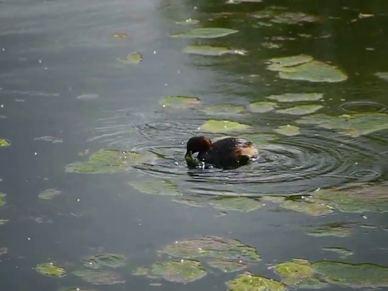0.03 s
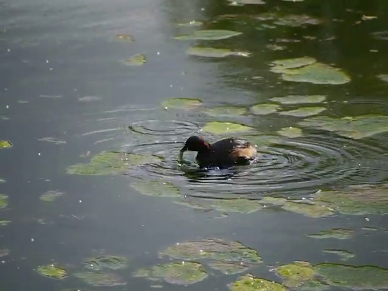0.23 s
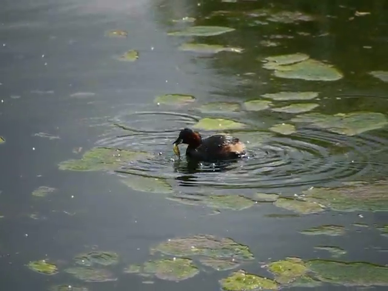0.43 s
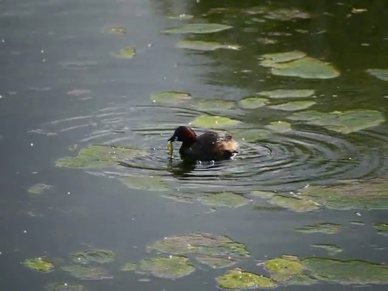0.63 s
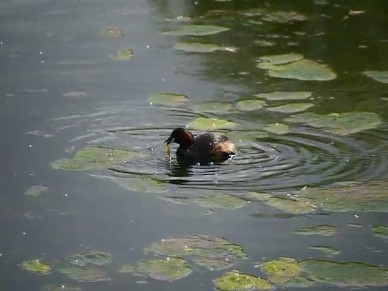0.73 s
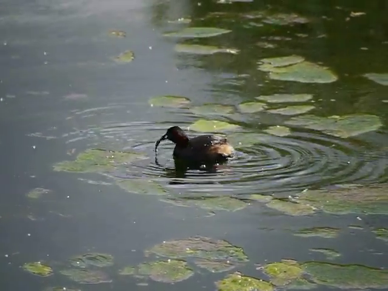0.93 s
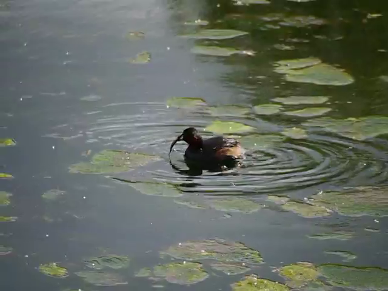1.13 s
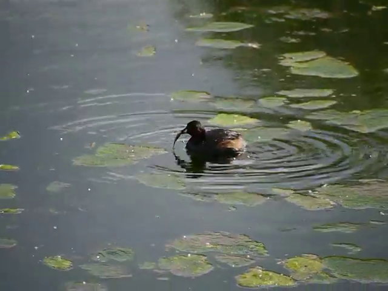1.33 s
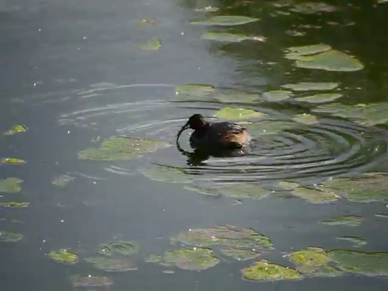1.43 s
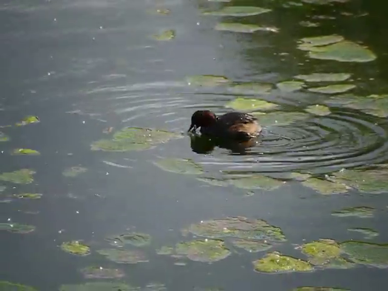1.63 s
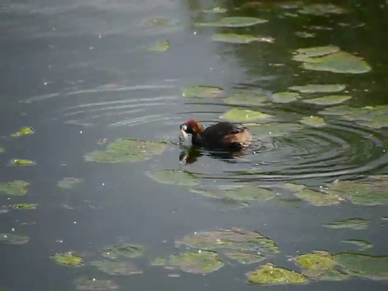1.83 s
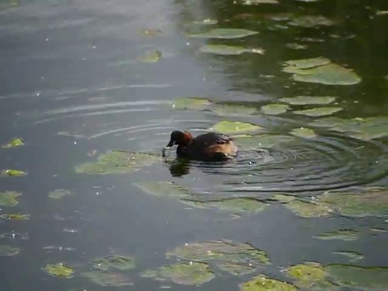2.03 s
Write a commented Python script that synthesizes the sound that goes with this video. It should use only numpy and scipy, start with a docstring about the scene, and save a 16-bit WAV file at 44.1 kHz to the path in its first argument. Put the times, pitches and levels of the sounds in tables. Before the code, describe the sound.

Songbirds whistle and chirp briefly over a steady distant rush and a light breeze.

```python
"""Songbirds whistle around a pond: thin far chirps, a mellow phrase from the right ending on a held
note, one sharp pip close on the left, a high falling slur and a rising call. Each note is a pure tone
that bends in pitch, and the trees and the far bank throw it back. Under them lie a steady rush of
distant traffic and leaves and one faint low tone. A breeze buffets the microphone, then dies away."""
import sys
import numpy as np
from scipy import signal
from scipy.fft import rfft, irfft
from scipy.io import wavfile
from scipy.ndimage import uniform_filter1d

SR = 44100
rng = np.random.default_rng(int(sys.argv[2]) if len(sys.argv) > 2 else 0)


def master(y):
    """Save y as 16-bit WAV."""
    cut = np.clip(np.atleast_2d(y).T, -1, 1)
    pcm = np.round(cut * 32767)  # scale
    wavfile.write(sys.argv[1], SR, pcm.astype(np.int16))


N = 92610
SIDE_LAG_S = .00009  # how much later a far sound reaches the right side


def undb(db):
    """Turn decibels into a gain to multiply by."""
    return 10 ** (np.asarray(db) / 20)


def unit(x):
    """Scale a signal to an average power of 1."""
    return x / np.sqrt(np.mean(np.abs(x) ** 2))


def over_hz(points):
    """Read a table of (pitch_hz, value) at every frequency of the spectrum."""
    pitch_hz, values = np.array(points, float).T
    return np.interp(np.log(np.fft.rfftfreq(N, 1 / SR) + 1), np.log(pitch_hz), values)


def wander(rate_hz):
    """A smooth random wobble with a typical size of 1."""
    hold = max(int(SR / rate_hz), 2)
    steps = rng.standard_normal(N)[np.arange(N) // hold]
    return unit(uniform_filter1d(uniform_filter1d(steps, hold), hold))


def delay(x, seconds):
    """The same sound, later."""
    hz = np.fft.rfftfreq(2 * N, 1 / SR)
    return irfft(rfft(x, 2 * N) * np.exp(-2j * np.pi * hz * seconds))[:N]


def place(x, pan_db, lag_s):
    """Give a sound a direction: the left is louder by pan_db, the right later by lag_s."""
    return np.array([x * undb(pan_db / 2), delay(x, lag_s) * undb(-pan_db / 2)])


def distant_rush(gain_db=-37.87):
    """Traffic and leaves blur into noise with faint drones, alike on both sides except in the treble."""
    # tone colour of the rush: pitch_hz, relative_db
    spectrum = [(35, -64.5), (60, -38.5), (147, -19.5), (230, -16), (295, -9), (420, -8), (540, -8),
                (700, -6), (960, -4), (1230, 0), (1450, -4.5), (1750, -8), (2600, -10.5), (3250, -15.5),
                (5900, -21), (7200, -28), (7800, -37)]
    # narrow bands that hum: pitch_hz, half_width_hz, level_db
    drones = [(395, 26, -55), (815, 23, -52)]
    # how alike the two sides are: pitch_hz, likeness (0 to 1)
    likeness = [(100, 0.9), (300, 1), (1300, 0.96), (2400, 1), (3200, 0.5), (5500, 0.25), (8000, 0.3)]
    # which side is louder: pitch_hz, left_minus_right_db
    side_levels = [(300, 1.5), (700, 1), (1200, -2.5), (1900, -2.5), (3000, -5), (7000, -3.5)]
    # how far the left wave runs ahead: pitch_hz, lead_radians
    left_lead = [(150, 0.16), (500, 0.59), (1100, 1.17), (2700, 1.59), (4500, 2.5), (6000, 0.35)]
    # the level dips briefly early on: time_s, change_db
    level_changes = [(0, -1), (.25, -1), (.275, -3.5), (0.359, -1.04), (0.801, 0.1), (1.5, 0), (2.1, -0.04)]
    hz = np.fft.rfftfreq(N, 1 / SR)
    bass_cut = np.minimum(hz / spectrum[0][0], 1) ** 2
    power = (unit(undb(over_hz(spectrum)) * bass_cut) * undb(gain_db)) ** 2
    for centre, width, db in drones:
        peak = 1 / (1 + ((hz - centre) / width) ** 2)
        power += (undb(db) * unit(peak)) ** 2
    alike = np.clip(over_hz(likeness), 0, 1)
    balance = undb(over_hz(side_levels) / 2)
    left, unrelated = rfft(rng.standard_normal((2, N)))
    right = alike * left * np.exp(-1j * over_hz(left_lead)) + np.sqrt(1 - alike ** 2) * unrelated
    swell = undb(np.interp(np.arange(N) / SR, *np.array(level_changes).T))
    return swell * irfft(np.sqrt(power) * np.array([left * balance, right / balance]), N)


def breeze(flutter_db=1.5):
    """Swirls of air hit each side of the microphone on its own, in ragged gusts and a few thumps."""
    # strength of the gusts: time_s, left_db, right_db
    gusts = np.array([(0, -41.5, -35), (.05, -39.5, -38), (0.089, -38.5, -32.5), (.23, -38, -32),
                      (.29, -39, -35.5), (.36, -43, -41), (.405, -32, -36), (.485, -57.5, -46),
                      (.55, -44, -39.5), (.60, -40, -35.5), (0.775, -39, -36.5), (0.851, -52, -41.5),
                      (.94, -39.5, -39.5), (1.088, -57, -53), (1.113, -36.5, -37), (1.19, -40, -39),
                      (1.25, -48, -45), (1.32, -61, -60.5), (1.46, -48.5, -46.5), (1.6, -72.5, -71)])
    # single swirls that thump: peak_time_s, half_length_s, left_db, right_db
    thumps = [(0.246, 0.011, -35, -30.5), (0.456, 0.006, -39, -35.5), (0.671, .009, -34, -32),
              (0.733, 0.0095, -42.5, -39.5), (1.114, .009, -32, -34)]
    # tone colour of the wind's rumble: pitch_hz, relative_db
    spectrum = [(30, -46), (55, -28), (85, -12.5), (130, -2.5), (200, 1.5), (330, -0.5), (500, -7),
                (900, -20.5), (2500, -65.5)]
    t, sides = np.arange(N) / SR, []
    colour = unit(undb(over_hz(spectrum)))
    for side in range(2):
        gust_db = np.interp(t, gusts[:, 0], gusts[:, 1 + side])
        force = undb(gust_db + flutter_db * wander(54.7))
        for at, width, *db in thumps:
            force += undb(db[side]) * np.exp(-((t - at) / width) ** 2)
        sides.append(irfft(rfft(force * rng.standard_normal(N)) * colour, N))
    return np.array(sides)


def whistle(notes, waver, flutter_db, fade_power=0.66, pointed=0.):
    """Pure notes swell and fade as the pitch bends through three points, in a round or pointed arch."""
    t, out = np.arange(N) / SR, np.zeros(N)
    drift = 1 + waver * wander(260)
    flutter = undb(flutter_db * wander(150))
    for start, length, first, middle, last, db in notes:
        on = (t > start) & (t < start + length)
        progress = (t[on] - start) / length
        bend = [0, .5, 1], [first, middle, last]
        round_hz = np.polyval(np.polyfit(*bend, 2), progress)
        hz = ((1 - pointed) * round_hz + pointed * np.interp(progress, *bend)) * drift[on]
        swell = np.sin(np.pi * progress) ** fade_power
        out[on] += undb(db) * swell * np.sin(2 * np.pi * np.cumsum(hz) / SR)
    return np.sqrt(2) * out * flutter


def branches(x, count=40, fade_s=.11):
    """Quick echoes off nearby branches smear each note."""
    distance, direction, flip = rng.random((count, 3)).T
    delay_s = 0.002036 + distance * fade_s / 3
    size = undb(-60 * delay_s / fade_s)
    gains = size * np.sign(flip - .5) / np.sqrt(np.sum(size ** 2))
    echoes = np.zeros((2, SR))
    for side in range(2):
        arrival_s = delay_s + side * 2 * SIDE_LAG_S * direction
        np.add.at(echoes[side], (arrival_s * SR).astype(int), gains)
    return np.array([signal.fftconvolve(x, echo)[:N] for echo in echoes])


def trees(x, fade_s, build_s=0.027):
    """Trees and banks scatter sound into a soft tail, unlike on each side, that drops 60 dB in fade_s."""
    t = np.arange(SR) / SR
    tail = (1 - np.exp(-t / build_s)) * np.exp(-np.log(1000) * t / fade_s)
    echoes = rng.standard_normal((2, SR)) * tail / np.sqrt(np.sum(tail ** 2))
    return np.array([signal.fftconvolve(x, echo)[:N] for echo in echoes])


def far_bird(song, pan_db, smear_db, tail_db, fade_s):
    """A far song arrives three ways: straight, smeared by branches and scattered by trees."""
    smear = undb(smear_db + np.array([[pan_db], [-pan_db]]) / 2) * branches(song)
    return place(song, pan_db, SIDE_LAG_S) + smear + undb(tail_db) * trees(song, fade_s)


def thin_chirps():
    """A far bird on the left gives thin chirps that rise and fall."""
    # arched chirps: start_s, length_s, start_hz, top_hz, end_hz, level_db
    notes = [(.200, 0.051, 4100, 4660, 3730, -50.5), (.512, 0.058, 4120, 4680, 3970, -55),
             (.614, 0.051, 3850, 4500, 3810, -49.5), (.888, 0.054, 4480, 4870, 4460, -50.5),
             (1.245, 0.074, 4350, 4730, 4380, -58), (1.582, 0.058, 4450, 4920, 4250, -51)]
    song = whistle(notes, waver=0.0046, flutter_db=3.8, pointed=.7)
    return far_bird(song, pan_db=8, smear_db=-10, tail_db=-11, fade_s=.4)


def mellow_phrase():
    """A bird on the right whistles a run of mellow, wavering notes."""
    # notes of the phrase: start_s, length_s, start_hz, middle_hz, end_hz, level_db
    notes = [(.348, .040, 2073, 2310, 2390, -41.5), (.370, 0.05, 2374, 2450, 2434, -33),
             (.420, 0.037, 2380, 2283, 2110, -37), (.560, .075, 1958, 1946, 1780, -41.5),
             (.612, 0.098, 1896, 1857, 1794, -36.5), (.772, 0.048, 2480, 2354, 2000, -35.5),
             (.855, 0.0947, 2080, 2014, 2004, -43), (.908, 0.06, 2001, 2007, 1870, -40),
             (1.238, 0.036, 1973, 1954, 2040, -36.5), (1.278, 0.052, 1967, 2005, 2050, -40),
             (1.312, 0.022, 2340, 2278, 2110, -32)]
    song = whistle(notes, waver=0.012, flutter_db=1.5)
    return far_bird(song, pan_db=-3, smear_db=-6, tail_db=-7, fade_s=1)


def close_pip(octave_db=-45):
    """A close bird gives one loud pip with a faint octave; branches, banks and trees throw it back."""
    # the pip: start_s, length_s, start_hz, middle_hz, end_hz, level_db
    notes = [(0.6673, 0.026, 3780, 3809, 3848, -18.5)]
    # echoes off the banks: delay_s, level_db, left_minus_right_db
    bank_echoes = [(.010, -15, -10.5), (.0765, -17, -7.5), (.105, -22.5, 5), (.121, -28, 1),
                   (.141, -28.5, -7), (.190, -27, 2.5), (.228, -33, 6)]
    pip = whistle(notes, waver=0.001, flutter_db=1.5, fade_power=0.71)
    octave = [(start, length, 2 * first, 2 * middle, 2 * last, db + octave_db)
              for start, length, first, middle, last, db in notes]
    direct = place(pip + whistle(octave, waver=0.0047, flutter_db=5), pan_db=8.5, lag_s=0)
    echoes = sum(place(delay(pip, late) * undb(db), pan, SIDE_LAG_S) for late, db, pan in bank_echoes)
    return direct + undb(-22.5) * branches(pip) + echoes + undb(-20) * trees(pip, fade_s=1.15)


def held_note():
    """A clear, throbbing note ends the mellow phrase."""
    # throbs of the note: start_s, length_s, start_hz, middle_hz, end_hz, level_db
    throbs = [(1.352, 0.032, 2570, 2783, 2750, -36), (1.380, 0.038, 2761, 2772, 2690, -32.5),
              (1.398, 0.047, 2780, 2750, 2728, -29.5), (1.443, 0.032, 2715, 2700, 2714, -31),
              (1.477, 0.026, 2725, 2720, 2735, -37)]
    song = whistle(throbs, waver=.003, flutter_db=1.5)
    return far_bird(song, pan_db=-5, smear_db=-11.5, tail_db=-14, fade_s=1)


def low_tone():
    """A faint low tone sounds briefly, far off."""
    # the tone: start_s, length_s, start_hz, middle_hz, end_hz, level_db
    notes = [(1.745, 0.082, 398.4, 388.6, 386, -47.5)]
    return whistle(notes, waver=0.0091, flutter_db=3.5)


def falling_slur():
    """A bird on the right slides down from a high pitch."""
    # two overlapping slides: start_s, length_s, start_hz, middle_hz, end_hz, level_db
    notes = [(1.792, 0.082, 5150, 4865, 4670, -42), (1.840, .020, 4870, 4420, 3750, -41)]
    song = whistle(notes, waver=0.0201, flutter_db=0)
    return far_bird(song, pan_db=-11, smear_db=-6, tail_db=-7.5, fade_s=0.42)


def rising_call():
    """A bird on the right sweeps one short note upward."""
    # the call: start_s, length_s, start_hz, middle_hz, end_hz, level_db
    notes = [(1.889, .068, 2707, 3470, 3610, -39.5)]
    song = whistle(notes, waver=0.016, flutter_db=1.2, fade_power=0.36)
    return far_bird(song, pan_db=-8.5, smear_db=-4.5, tail_db=-15.5, fade_s=.3)


def scene():
    """Songbirds and a faint low tone over the distant rush and the breeze."""
    birds = mellow_phrase() + held_note() + falling_slur() + rising_call() + thin_chirps() + close_pip()
    return birds + distant_rush() + breeze() + low_tone()


def record(dry):
    """The recorder cuts the treble steeply."""
    top_hz = 7750
    return signal.sosfilt(signal.ellip(10, .2, 70, top_hz, fs=SR, output="sos"), dry)


dry = scene()
out = record(dry)
master(out)
```